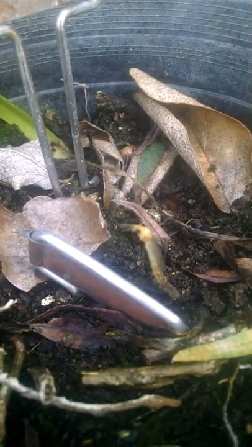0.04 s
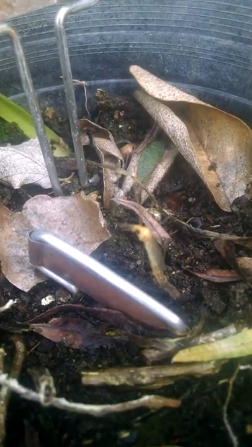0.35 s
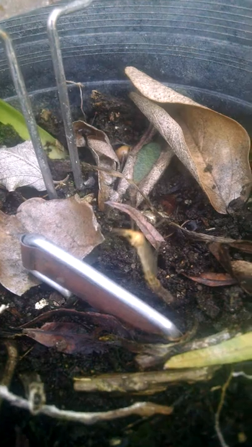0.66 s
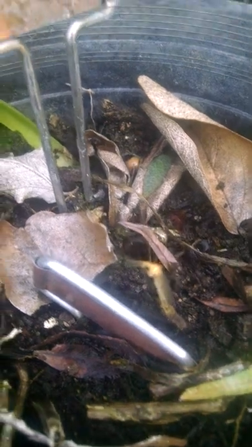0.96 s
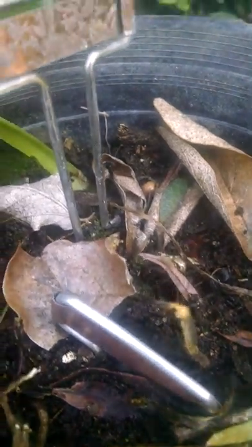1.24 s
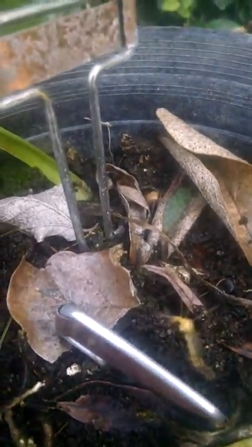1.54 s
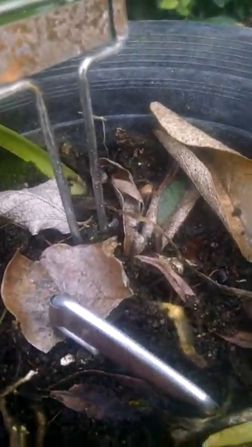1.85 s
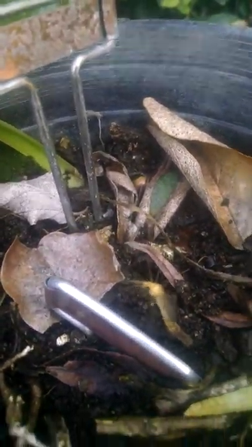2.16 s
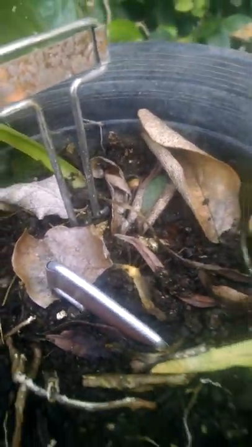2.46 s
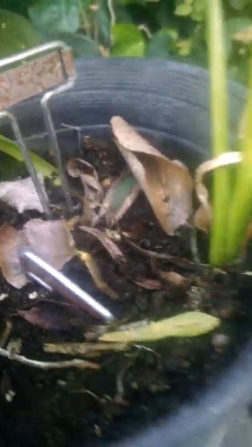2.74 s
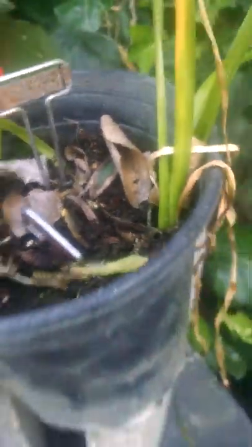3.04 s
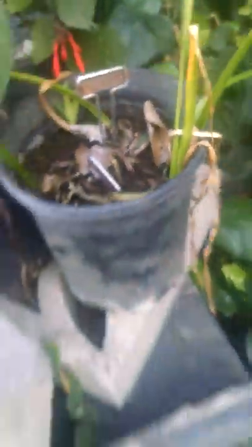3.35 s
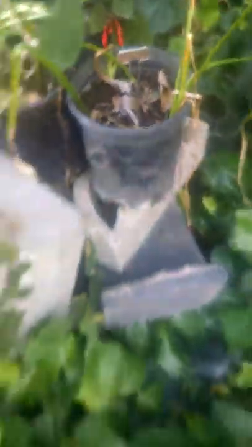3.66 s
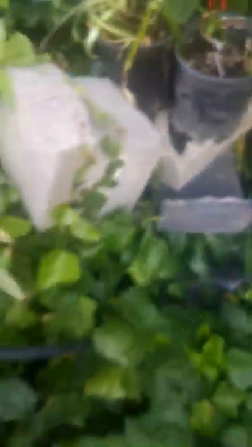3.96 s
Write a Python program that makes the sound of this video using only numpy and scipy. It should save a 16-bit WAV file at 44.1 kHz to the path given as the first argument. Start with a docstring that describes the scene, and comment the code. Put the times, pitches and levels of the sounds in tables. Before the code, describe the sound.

A low outdoor rumble and hiss runs throughout, with a distant motor humming. Faint birds chirp, mostly before 1.3 seconds. Fingers knock the microphone softly at 0.6 seconds, then more sharply at 2.8 and 3.4. From 2.4 seconds the motor's whirr grows, its thin whine swelling around 3.2 and 3.7. From 3.3 seconds until the end at 4, leaves brush past with small dry snaps.

```python
"""A quiet garden, heard by a handheld camera that peers into a plant pot and then draws back.
Distant rumble, hiss and a far motor's hum sound throughout. Faint birds chirp, mostly early on, and
the hand knocks now and then on the camera's case, whose modes ring briefly. From about 2.4 s the
motor's whirr opens up as the camera leaves the pot, and its thin whine then swells.
From about 3.3 s leaves brush past with friction hiss and small dry snaps."""
import sys
import numpy as np
from scipy import signal
from scipy.fft import rfft, irfft
from scipy.io import wavfile
from scipy.ndimage import uniform_filter1d

SR = 44100
rng = np.random.default_rng(int(sys.argv[2]) if len(sys.argv) > 2 else 0)


def master_out(mix):
    """Clip the mix to full scale and print it as 16-bit PCM to the path in sys.argv[1]."""
    frames = np.transpose(np.atleast_2d(mix))
    ceiling = np.clip(frames, -1, 1)
    pcm = np.round(ceiling * 32767).astype(np.int16)
    wavfile.write(sys.argv[1], SR, pcm)


N = 176400


def amp(db):
    """Amplitude ratio: a factor of ten for every 20 dB."""
    return 10 ** (np.asarray(db) / 20)


def unit(x):
    """Normalisation to an rms of 1."""
    return x / np.sqrt(np.mean(x ** 2) + 1e-20)


def read(points, hz):
    """A spectrum table, interpolated on a logarithmic frequency axis."""
    f, value = np.transpose(points)
    return np.interp(np.log(hz + 1), np.log(f + 1), value)


def level(points):
    """Amplitude envelope: points of time in seconds and gain in dB, joined linearly in dB."""
    return amp(np.interp(np.arange(N) / SR, *np.transpose(points)))


def pan(db):
    """Constant-power panning, with the left channel db above the right."""
    return unit(amp([[db / 2], [-db / 2]]))


def add(mix, start_s, sound):
    """Superposition of a sound on the mix from a given time."""
    part = mix[:, max(round(start_s * SR), 0):][:, :sound.shape[-1]]
    part += sound[..., :part.shape[1]]


def drift(rate_hz):
    """Smooth random fluctuation: low-passed noise of rms 1."""
    hz = np.fft.rfftfreq(N, 1 / SR)
    return unit(irfft(rfft(rng.standard_normal(N)) * np.exp(-(hz / rate_hz) ** 2), N))


def patchy(patch_db):
    """Random amplitude modulation of two white noises, in small patches of time and frequency."""
    spectra = signal.stft(rng.standard_normal((2, N)), nperseg=512, noverlap=384)[2]
    patches = uniform_filter1d(rng.standard_normal(spectra.shape[1:]), size=9, axis=0)
    patches = unit(uniform_filter1d(patches, size=24, axis=1))
    return unit(signal.istft(spectra * amp(patch_db * patches), nperseg=512, noverlap=384)[1][:, :N])


def microphone_pair(noises, colour):
    """Partial coherence: a wide source, its amplitude spectrum colour(hz), reaches two ports."""
    # Balance of the ports. Each row: frequency in Hz, left minus right in dB.
    balance = [(30, 2), (140, -2.5), (300, 4.5), (520, 1), (1000, -2), (1900, 2.5), (2650, -2), (4500, 1.2),
               (7000, -2.5), (9500, -8.5), (15000, -6)]
    # Likeness of the ports. Each row: frequency in Hz, correlation coefficient before the comb.
    correlation = [(25, 0.95), (65, 0.79), (170, 0.65), (290, 0.43), (600, 0.58), (1200, 0.55),
                   (2000, -0.26), (4000, 0.16), (15000, -0.13)]
    # Comb-shaped ripple in that likeness. Each row: frequency in Hz, depth as a coefficient.
    comb_depth = [(300, 0.095), (700, 0.0074), (1250, 0.66), (2200, 0.65), (2650, 1.0), (3900, 0.34),
                  (5300, 0.63), (9000, 0.21), (15000, 0.65)]
    comb_spacing_hz, echo_spread_s, echo_db = 2655, .007, -8.5
    hz = np.fft.rfftfreq(N, 1 / SR)
    # Reflections from the pot and the leaves interfere, rippling mainly the treble.
    delays = echo_spread_s * rng.uniform(0.115, 1, 10)
    echoes = sum(np.cos(2 * np.pi * (hz * delay + rng.random())) for delay in delays)
    ripple = unit(np.exp(amp(echo_db) * echoes / np.sqrt(len(delays)) * hz / (hz + 1500)))
    common, separate = rfft(noises) * ripple
    comb = read(comb_depth, hz) * np.cos(2 * np.pi * hz / comb_spacing_hz)
    likeness = np.clip(read(correlation, hz) - comb, -.995, .98)
    lean = amp(read(balance, hz))
    right = likeness * common + np.sqrt(1 - likeness ** 2) * separate
    pair = np.array([common * lean, right]) / np.sqrt(1 + lean ** 2)
    return irfft(pair * colour(hz), N) * np.sqrt(SR)


def tones(partials):
    """Frequency and amplitude modulation: wavering partials, with a phase lag between the ports."""
    out = np.zeros((2, N))
    for hz, db, pan_db, waver_hz, lag in partials:
        phase = 2 * np.pi * np.cumsum(hz + waver_hz * drift(rate_hz=12.53)) / SR
        flutter = 1 + 0.35 * drift(rate_hz=7.4)
        out += pan(pan_db) * amp(db) * np.sqrt(2) * np.sin([phase, phase - lag]) * flutter
    return out


def air():
    """Ambient noise: distant rumble and hiss form a steady continuous spectrum."""
    # Outdoor background. Each row: frequency in Hz, spectral density in dB per Hz.
    spectrum = [(12, -68), (30, -69.5), (65, -61.5), (140, -65), (190, -70), (290, -74), (500, -76),
                (1000, -82), (1400, -88.5), (1900, -91), (2230, -92), (2700, -92), (3800, -92.5),
                (5500, -95.5), (7000, -97.5), (8900, -96.5), (9550, -94.5), (10300, -98.5), (11800, -99.3),
                (12600, -101.2), (13300, -99.6), (15000, -102.8)]
    return microphone_pair(patchy(patch_db=0.88), lambda hz: amp(read(spectrum, hz)))


def motor_hum():
    """Periodic vibration: a far motor radiates three nearly harmonic low partials."""
    # Each row: frequency in Hz, level in dB, leftward pan in dB, waver in Hz, right lag in radians.
    partials = [(116.5, -51.5, -1, 1.06, 0.0094), (234, -57, -13, 2.85, 0.0076), (357, -60, -6, 3, 0.0053)]
    return tones(partials)


def motor_whirr():
    """Acoustic shadow: the pot at first shields the motor's broad, resonant noise."""
    # Broad body of the whirr. Each row: frequency in Hz, density before shielding in dB per Hz.
    body = [(250, -92), (480, -70), (750, -74), (1150, -82.5), (1550, -91), (2700, -100), (4500, -98.5),
            (9000, -86.5), (15000, -108)]
    # Each row: centre in Hz, width in Hz, peak density before shielding in dB per Hz.
    resonances = [(1210, 500, -78), (1744, 140, -80), (2204, 210, -79.5), (3100, 340, -83)]
    # The shielding eases as the camera leaves the pot. Each row: time in seconds, gain in dB.
    shielding = [(0, -18), (2.4, -17.5), (2.9, -11), (3.2, -11.5), (3.55, -8), (3.75, -5), (4, -5.5)]

    def colour(hz):
        peak_power = sum(amp(db) ** 2 / (1 + (2 * (hz - centre) / width) ** 2) ** 2
                         for centre, width, db in resonances)
        return np.sqrt(amp(read(body, hz)) ** 2 + peak_power)
    return microphone_pair(patchy(patch_db=4.0), colour) * level(shielding)


def motor_whine():
    """Line spectrum: the motor's thin high partials, shielded at first, swell and fade."""
    # Each row: frequency in Hz, level before the swell in dB, leftward pan in dB, waver in Hz,
    # right lag in radians.
    partials = [(1738, -55, -4, 8, .4), (2240, -61.5, 1, 9, 2), (3363, -70, 0, 14, 0)]
    # Envelope of the whine. Each row: time in seconds, gain in dB.
    swell = [(0, -22), (3.1, -18.5), (3.23, -7.5), (3.34, -16), (3.58, -15), (3.68, -4.5), (3.8, -5),
             (3.89, -21), (4, -12)]
    return tones(partials) * level(swell)


def birds():
    """Reverberation: the garden's echoes give faint falling chirps an exponential tail."""
    # Far chirps. Each row: start in seconds, length in seconds, first and last pitch in Hz, level in dB.
    chirps = [(0.262, .115, 3890, 3850, -64), (0.3, .05, 4200, 4050, -65.5), (0.34, .06, 3860, 3670, -61.5),
              (0.652, .135, 4030, 3870, -62.5), (0.69, .06, 3750, 3350, -66), (0.8, .1, 3880, 3760, -67),
              (0.885, .06, 4900, 4780, -67), (1.06, .043, 4290, 4140, -60.5),
              (1.068, .045, 3790, 3620, -57.5), (1.2, .04, 3690, 3560, -65.5),
              (1.882, 0.052, 3550, 3420, -63), (2.941, .05, 3900, 3780, -64)]
    blur_hz, t60_s = 85, .33
    direct = np.zeros((2, N))
    for start_s, length_s, first_hz, last_hz, db in chirps:
        count = int(length_s * SR)
        pitch = np.linspace(first_hz, last_hz, count) + blur_hz * drift(rate_hz=390)[:count]
        envelope = amp(db) * np.sin(np.linspace(0, np.pi, count))
        add(direct, start_s, envelope * np.sqrt(2) * np.sin(2 * np.pi * np.cumsum(pitch) / SR))
    tail = rng.standard_normal((2, SR // 2)) * amp(-60 * np.arange(SR // 2) / SR / t60_s)
    tail /= np.linalg.norm(tail[0])  # echoes about as strong as the direct sound
    return direct + signal.fftconvolve(direct, tail, axes=1)[:, :N]


def knocks():
    """Impact excitation: fingers tap the case, giving a noisy crack and briefly ringing modes."""
    # Each row: start in seconds, gain in dB, factor on rise and decay times, leftward pan in dB,
    # favoured frequency in Hz, treble cutoff in Hz.
    taps = [(.622, -40, .8, -2, 1500, 1700), (2.7724, -29.5, .26, 4, 3100, 7000),
            (3.4432, -32.5, .3, 0, 3400, 5000), (3.4442, -27, .8, -2.5, 1600, 15000)]
    # Modes of the case. Each row: frequency in Hz, relative level in dB, unscaled T60 in seconds.
    modes = [(1012, -7, .036), (1235, -8, .04), (1545, -9, .03), (1950, -12, .022), (2350, -10, .024),
             (2950, -10, .014), (3260, -8, .02), (3830, -9, .022), (6560, -13, .022), (6960, -5, .034),
             (7690, -16, .025)]
    # Contact crack. Each row: frequency in Hz, relative level in dB.
    crack_spectrum = [(400, -24), (800, -10), (1300, 11), (2100, -2), (3000, 9), (3900, -6), (5200, -13),
                      (7000, 3), (10000, -11), (15000, -28)]
    base_rise_s, base_crack_s, crack_db = 0.00053, 0.0038, -6.5
    lift_db, lift_octaves = 4, 0.17
    out, t, hz = np.zeros((2, N)), np.arange(4096) / SR, np.fft.rfftfreq(4096, 1 / SR)
    for start_s, db, ring, pan_db, favoured_hz, cutoff_hz in taps:
        def touch_db(f):
            """The struck spot favours one range, and a soft touch dulls the treble."""
            lift = lift_db / (1 + (np.log2((f + 1) / favoured_hz) / lift_octaves) ** 2)
            return lift - 10 * np.log10(1 + (f / cutoff_hz) ** 4)
        phases = 1.07 * rng.standard_normal((len(modes), 2, 1))
        body = sum(amp(mode_db + touch_db(f) - 60 * t / (t60 * ring)) * np.sin(2 * np.pi * f * t + phase)
                   for (f, mode_db, t60), phase in zip(modes, phases))
        colour = amp(read(crack_spectrum, hz) + touch_db(hz))
        noise = unit(irfft(rfft(rng.standard_normal((2, len(t)))) * colour))
        crack = amp(crack_db) * noise * np.exp(-t / (base_crack_s * ring))
        attack = 1 - np.exp(-t / (base_rise_s * ring))
        add(out, start_s, pan(pan_db) * amp(db) * (body + crack) * attack)
    return out


def leaves():
    """Friction noise: brushing leaves give a soft hiss mixed with tiny random impulses."""
    # Colour of the brush. Each row: frequency in Hz, density before the envelope in dB per Hz.
    spectrum = [(150, -108), (450, -73.5), (900, -82.5), (2000, -86), (3600, -86.5), (6000, -92.5),
                (9300, -88.5), (12000, -92.5), (15000, -95)]
    # Envelope from the pressure of the leaves. Each row: time in seconds, gain in dB.
    pressure = [(0, -45), (3.25, -45), (3.36, -4), (3.41, -7.5), (3.56, -7.5), (3.705, -8), (3.735, 1),
                (3.89, -2.5), (4, -2)]
    grains_per_s, grain_power_share, spread_db = 1800, 0.31, 3
    sizes = amp(spread_db * np.minimum(rng.exponential(1, N), 3))
    onsets = rng.random(N) < grains_per_s / SR
    grains = unit(sizes * onsets * rng.uniform(-0.98, 1, (2, N)))
    friction = np.sqrt(grain_power_share) * grains + np.sqrt(1 - grain_power_share) * patchy(patch_db=2.5)
    return microphone_pair(friction * level(pressure), lambda hz: amp(read(spectrum, hz)))


def snaps():
    """Stick and slip: leaves and stems catch and let go in bright, fast-decaying noise bursts."""
    # Each row: start in seconds, initial level in dB, band centre in Hz, decay time in seconds.
    releases = [(3.4625, -39, 8900, 0.0013), (3.564, -43, 12000, 0.0023), (3.5692, -40.5, 8700, 0.0042),
                (3.5697, -39.5, 3540, .002), (3.7238, -40, 11500, .001), (3.739, -45, 13000, .003),
                (3.7678, -42, 9500, .0015), (3.8611, -38, 14000, 0.001), (3.895, -34.5, 9500, 0.0012),
                (3.9282, -33, 9000, .0006), (3.931, -37, 9000, 0.0015)]
    half_width_octaves, pan_db = 0.57, -9
    out, t, hz = np.zeros((2, N)), np.arange(2048) / SR, np.fft.rfftfreq(2048, 1 / SR)
    for start_s, db, centre_hz, decay_s in releases:
        band = 1 / (1 + (np.log2((hz + 1) / centre_hz) / half_width_octaves) ** 2)
        burst = unit(irfft(rfft(rng.standard_normal((2, len(t)))) * band))
        add(out, start_s, pan(pan_db) * amp(db) * burst * np.exp(-t / decay_s))
    return out


def scene():
    """Superposition: the pressures of all sources add at each port."""
    return air() + motor_hum() + motor_whirr() + motor_whine() + birds() + knocks() + leaves() + snaps()


def record(dry):
    """Band limiting: a linear-phase low-pass filter removes the highest treble."""
    cutoff_hz = 15600
    low_pass = signal.firwin(511, cutoff_hz, window=("kaiser", 9), fs=SR)
    return signal.oaconvolve(dry, low_pass[None], "same")


dry = scene()
out = record(dry)
master_out(out)
```